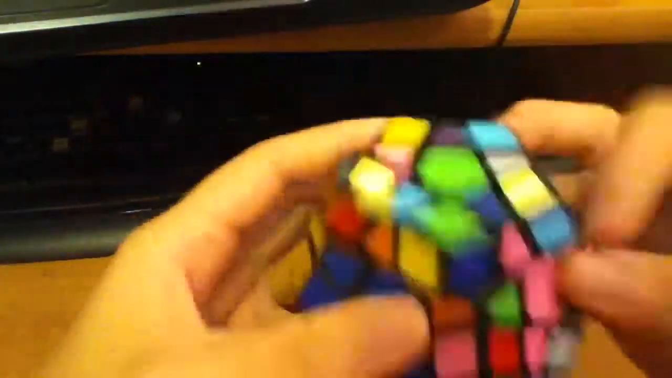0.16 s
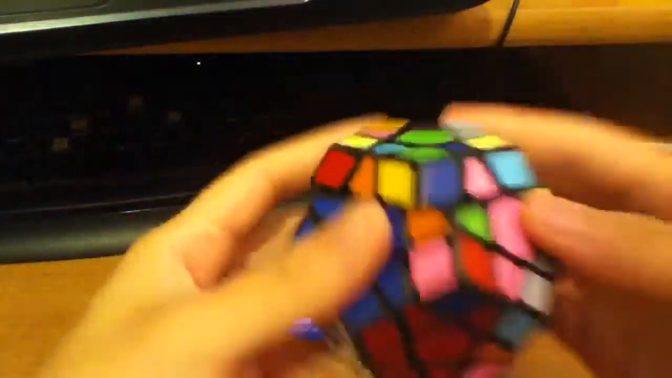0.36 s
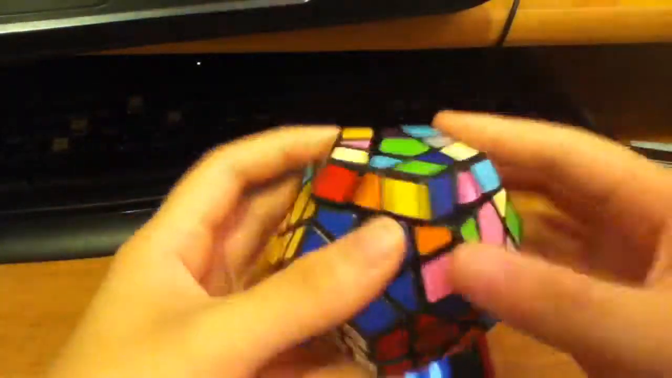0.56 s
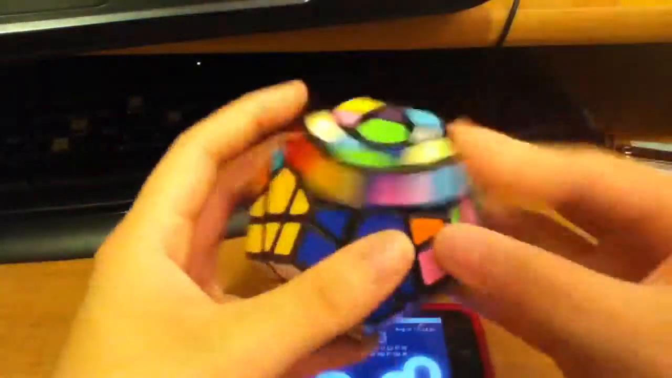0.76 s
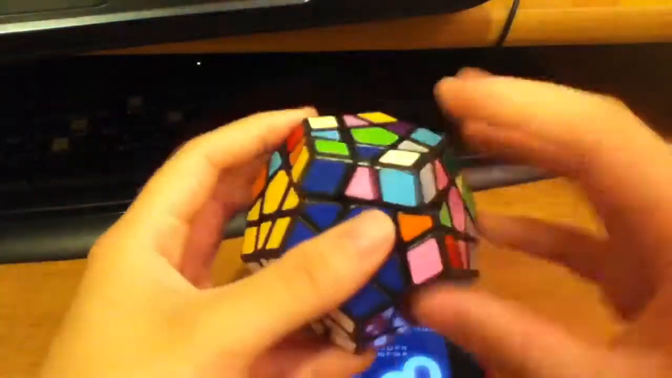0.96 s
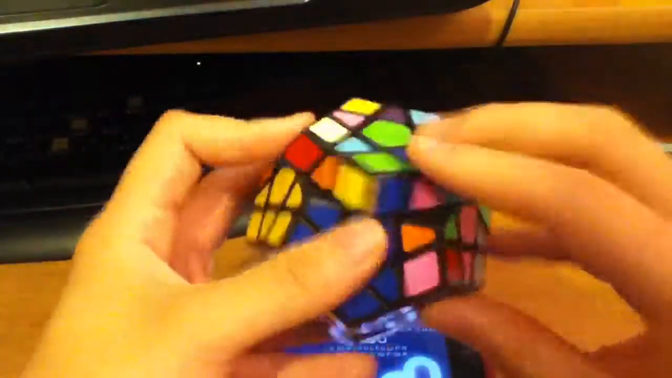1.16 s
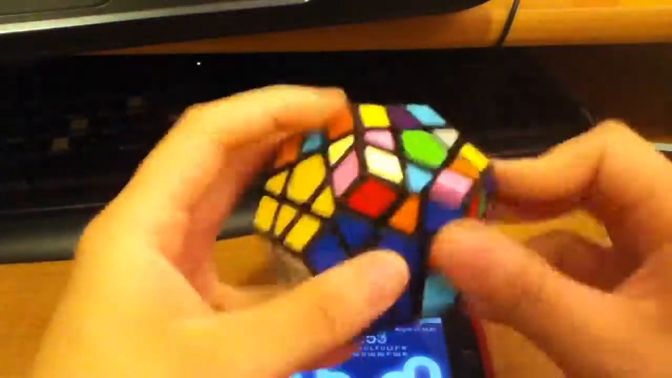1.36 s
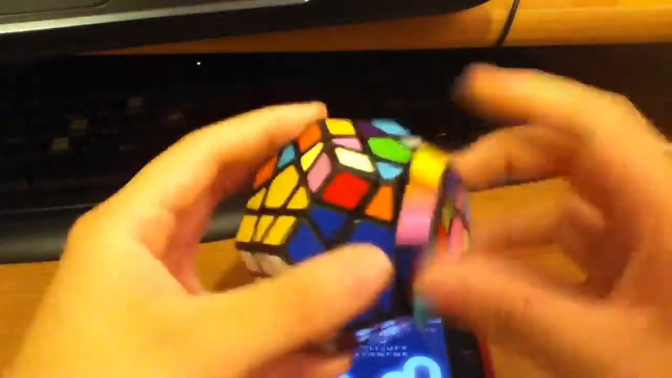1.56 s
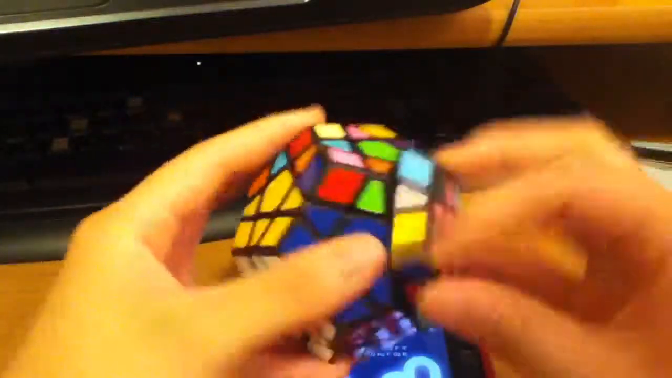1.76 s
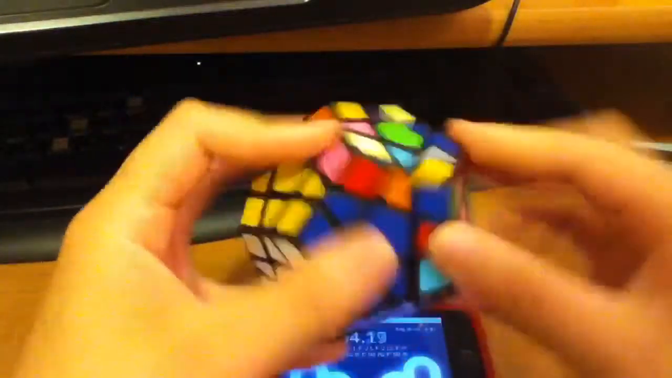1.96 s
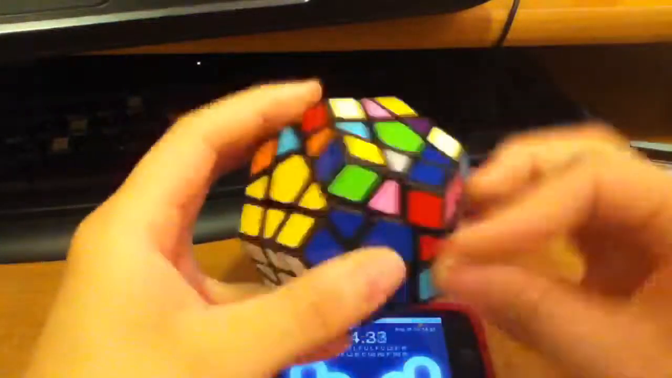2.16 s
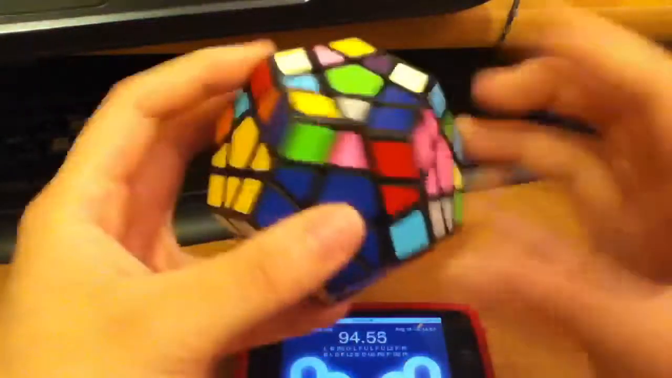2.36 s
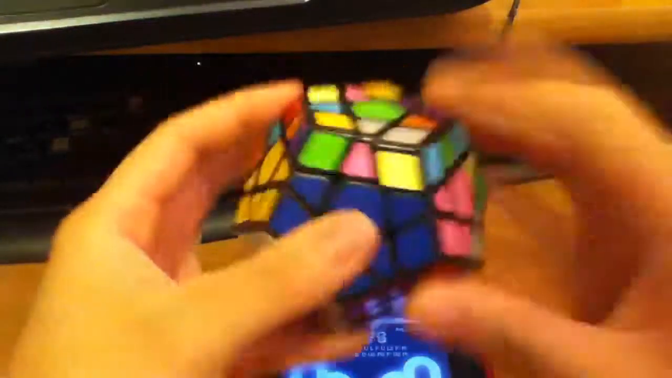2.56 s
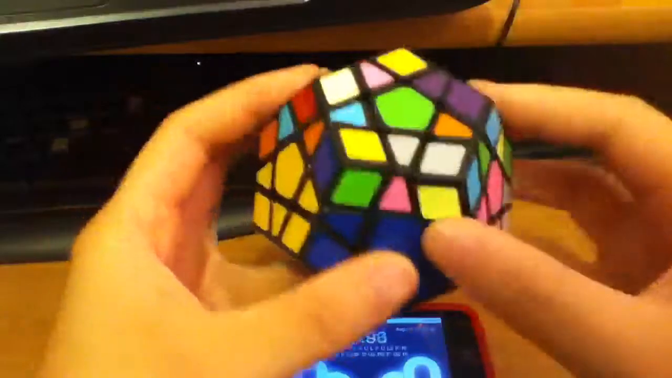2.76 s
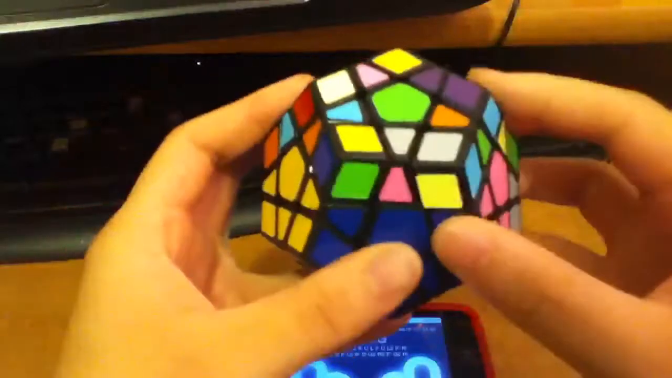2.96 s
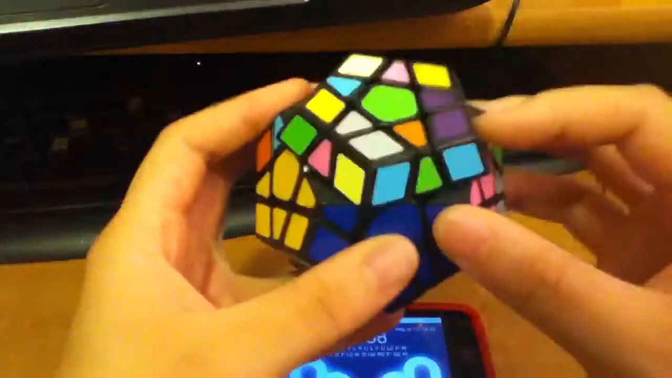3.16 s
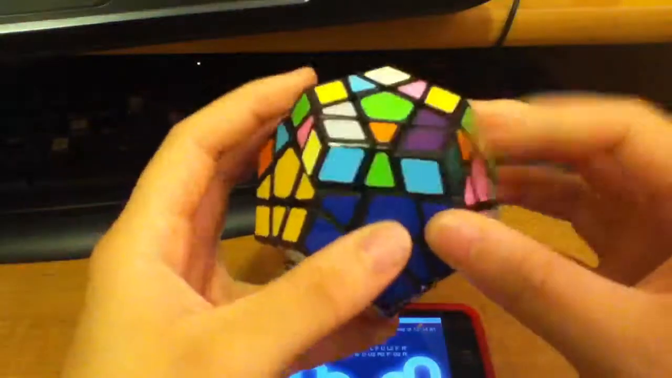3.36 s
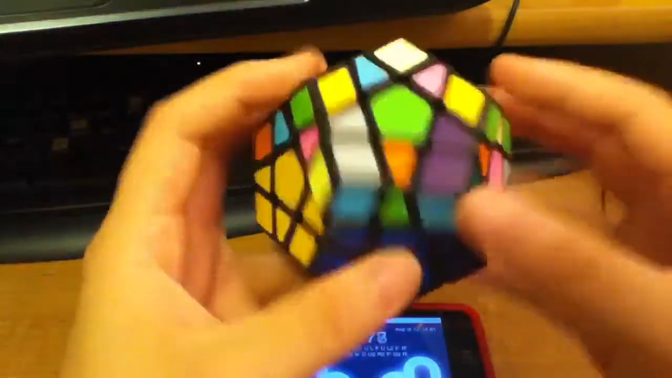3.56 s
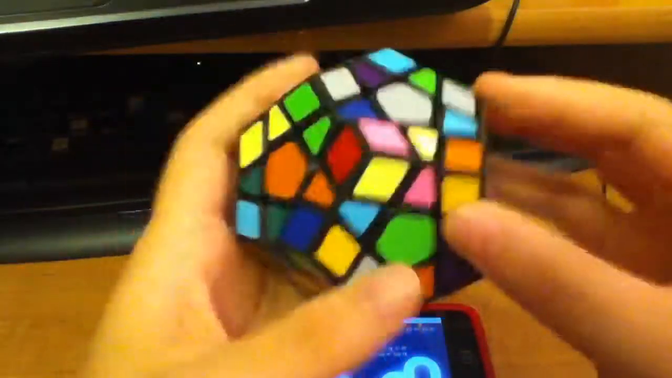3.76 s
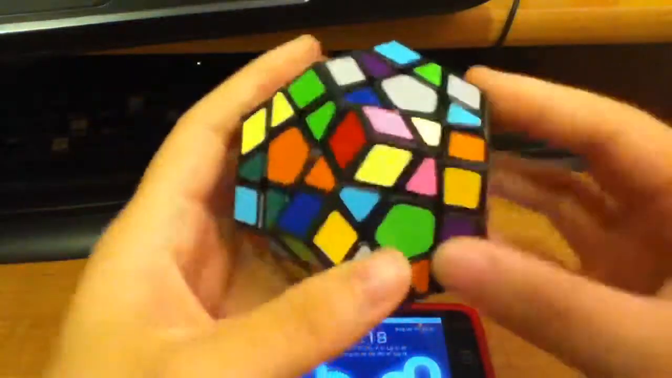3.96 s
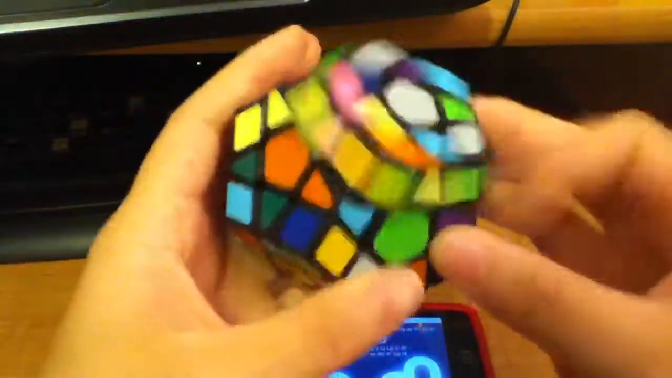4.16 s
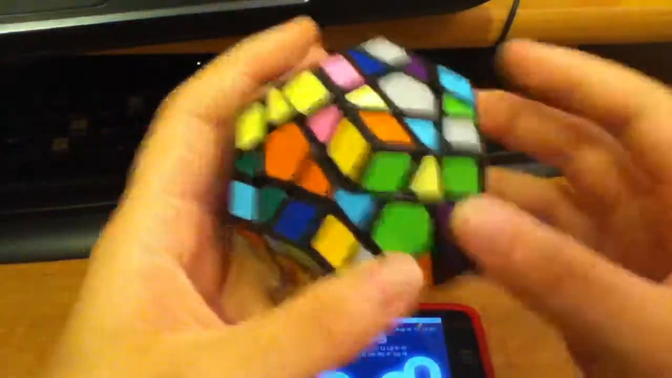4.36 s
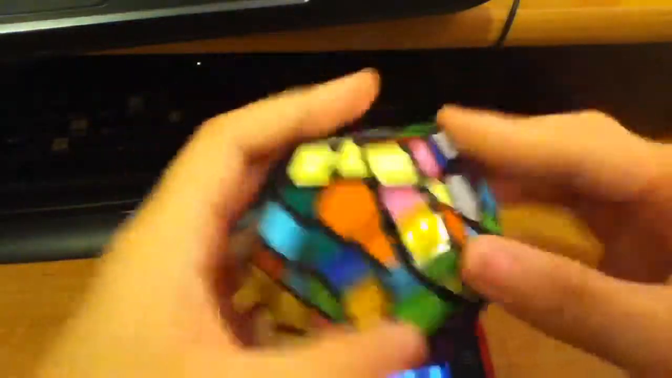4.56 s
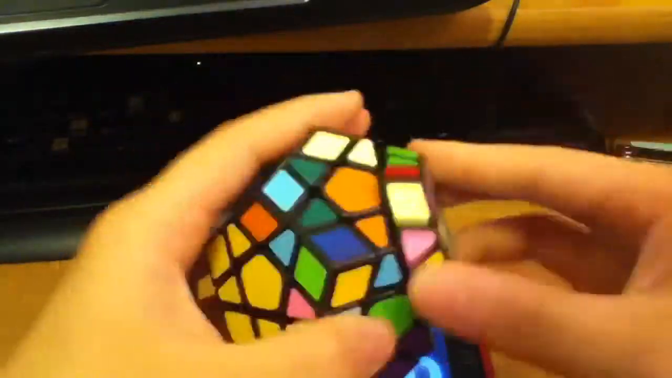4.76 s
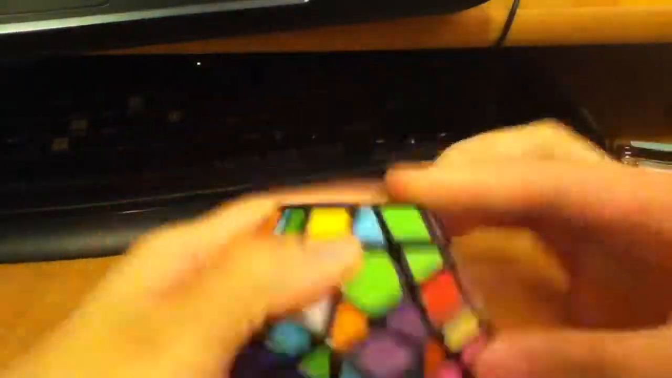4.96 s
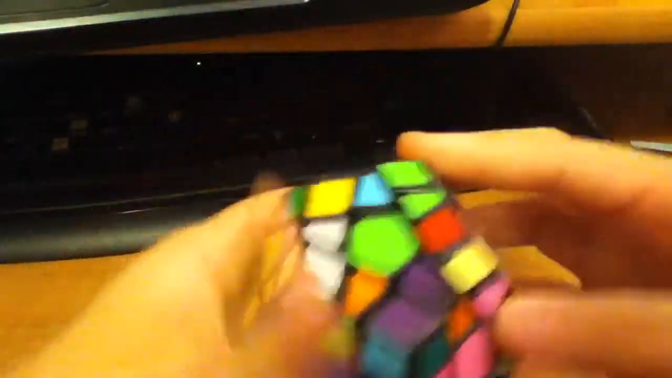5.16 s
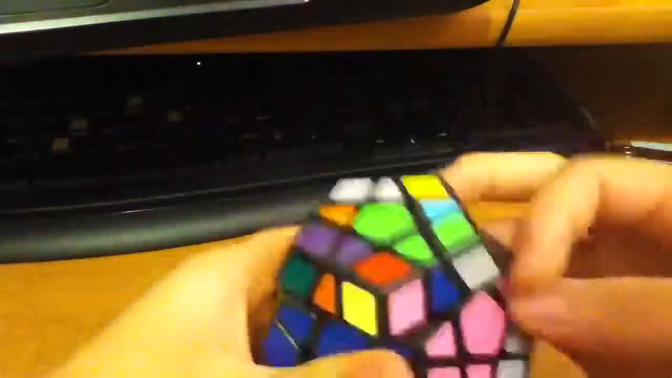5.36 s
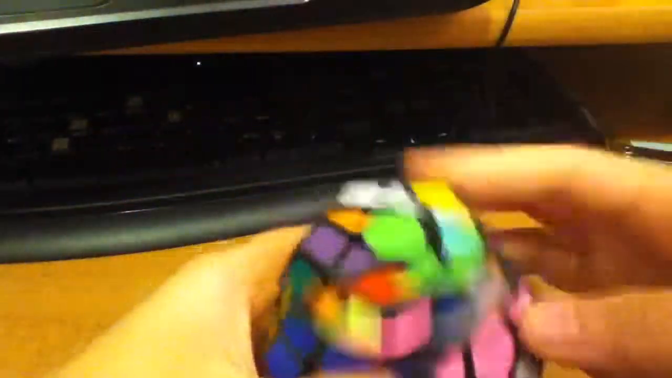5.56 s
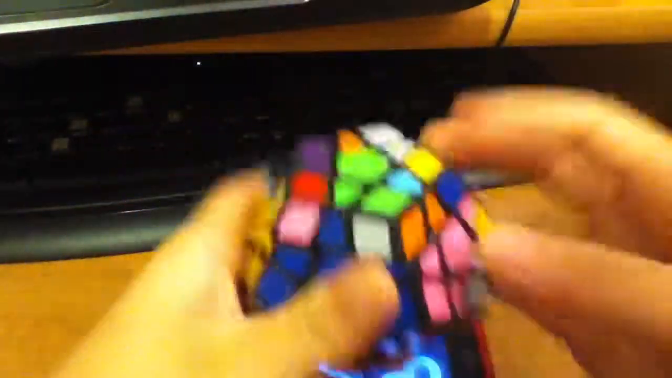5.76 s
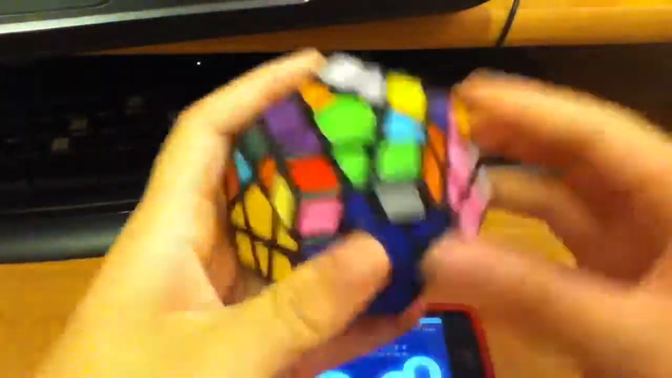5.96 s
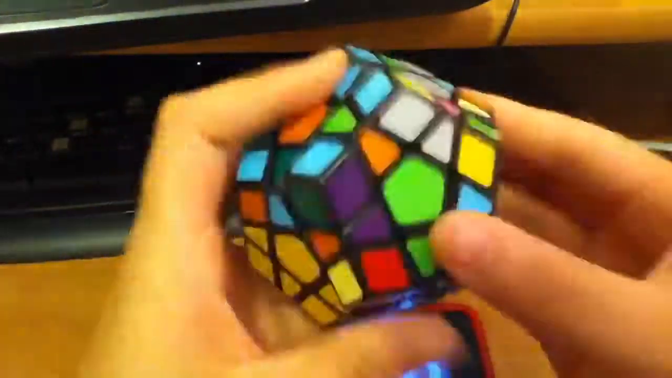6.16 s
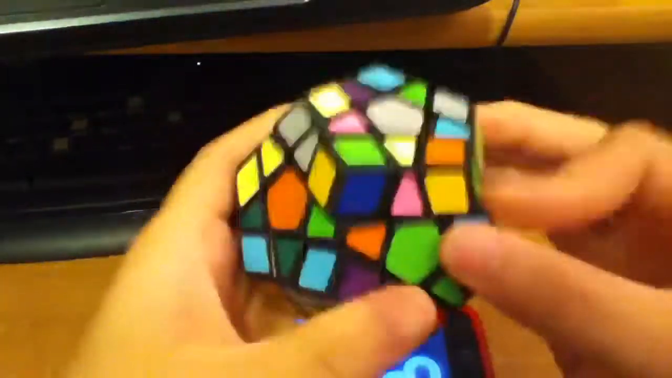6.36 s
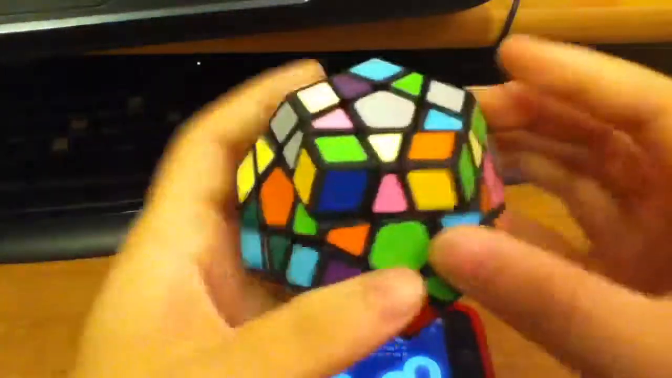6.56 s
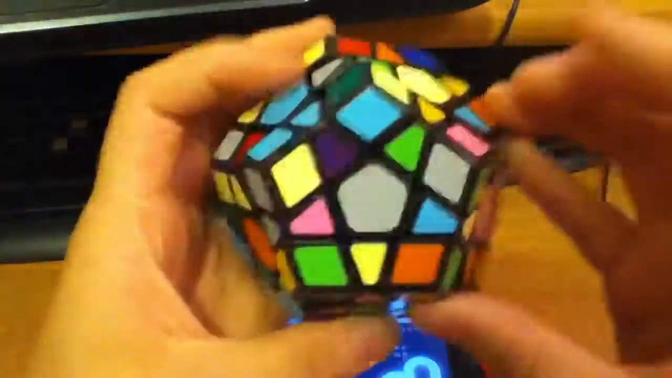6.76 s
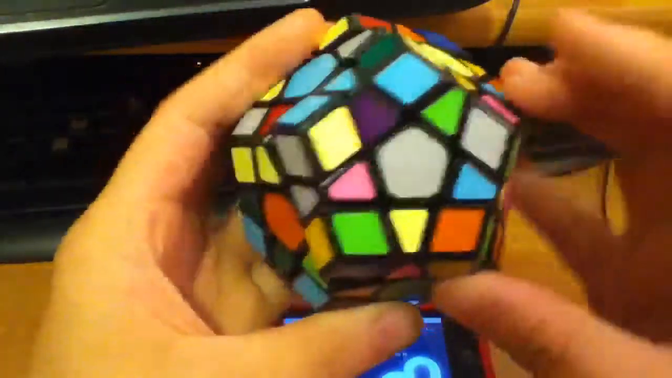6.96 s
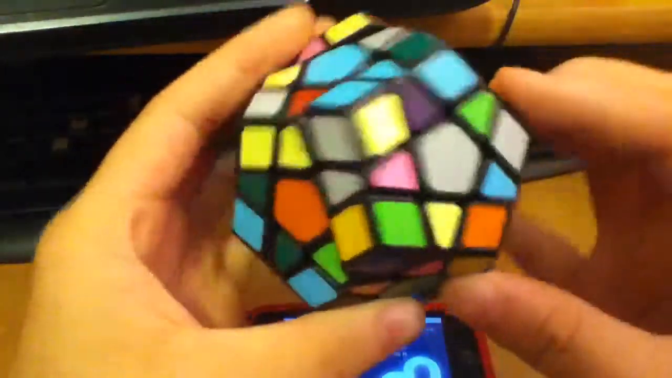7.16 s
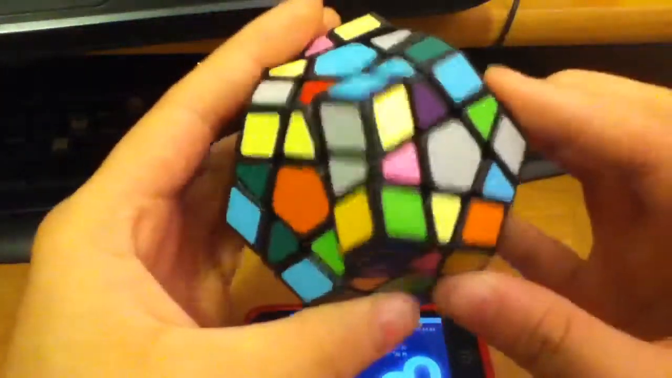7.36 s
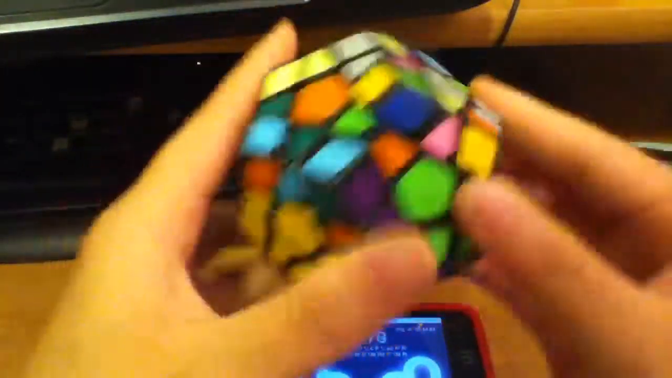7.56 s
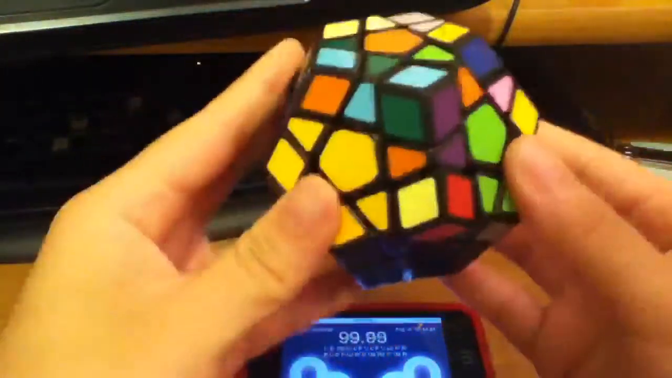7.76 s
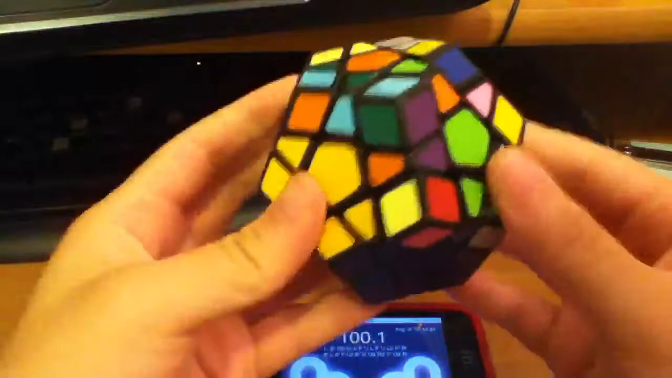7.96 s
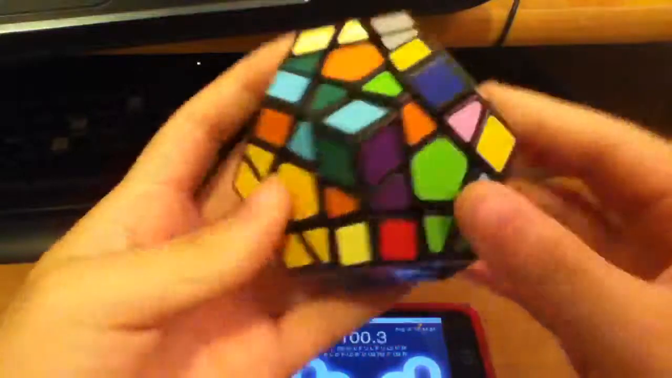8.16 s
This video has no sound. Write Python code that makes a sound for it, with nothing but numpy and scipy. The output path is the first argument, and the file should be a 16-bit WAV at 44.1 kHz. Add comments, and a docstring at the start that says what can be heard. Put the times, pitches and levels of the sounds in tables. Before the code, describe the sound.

Close to the microphone, a many-piece plastic puzzle is twisted fast by hand. Short dry rattles end in sharp hollow snaps, densest in the first two and a half seconds, then sparser with thinking pauses. Another busy cluster comes around five seconds, a last strong clack before six and a half, then mostly quiet. Soft low hand bumps and a small room's short echo sit over a computer fan's hum and faint hiss.

```python
"""At a desk in a small room, a twelve-sided plastic twisting puzzle is solved quickly by hand, close to a microphone.
Each turn of a face is a short rattle: many random touches, each sounding one of a set of hollow clacks.
Sharp clicks, built from the same kind of clack, mark where pieces catch and snap home.
The hands make soft low bumps from fading sine waves, and filtered noise gives the room's answer.
A computer fan hums with noise and wavering tones under a faint hiss."""
import sys
import numpy as np
from scipy import signal
from scipy.fft import rfft, irfft, next_fast_len
from scipy.io import wavfile
from scipy.ndimage import map_coordinates

SR = 44100
rng = np.random.default_rng(int(sys.argv[2]) if len(sys.argv) > 2 else 0)


def wav_out(sig):
    """Save sig, one row per channel (or a flat mono array), as 16-bit PCM at SR to the path in sys.argv[1]."""
    wavfile.write(sys.argv[1], SR, np.round(np.clip(np.atleast_2d(sig).T, -1, 1) * 32767).astype(np.int16))


N = 362495

# Turns of a face. Each row: fastest moment in seconds, rise in seconds, fall in seconds,
# strength of the rattle in dB.
TURNS = [(.206, 0.038, 0.04, -27.5), (0.857, 0.03, 0.039, -32.5), (1.155, 0.057, 0.015, -47),
         (1.32, 0.084, 0.092, -38), (1.519, 0.02, 0.057, -39.5), (1.699, 0.06, .085, -40.5),
         (1.771, 0.017, 0.043, -20.5), (1.934, 0.066, 0.052, -35), (2.039, 0.051, .045, -37.5),
         (2.207, 0.031, 0.0164, -22.5), (2.574, 0.054, 0.083, -39), (3.183, 0.058, 0.015, -36),
         (3.33, 0.056, .019, -46.5), (3.776, 0.023, 0.026, -47), (4.229, .038, .038, -29),
         (4.631, 0.067, 0.088, -53), (4.717, 0.013, .013, -32.5), (4.926, 0.048, 0.048, -40.5),
         (5.035, 0.01, 0.0162, -18), (5.418, 0.033, 0.033, -24.5), (5.551, 0.013, 0.0066, -30.5),
         (5.699, .026, 0.028, -28.5), (6.025, 0.033, 0.089, -52.5), (6.386, 0.038, 0.041, -29.5)]
TYPICAL_DB = -30  # the level that clicks and turns are compared with


def amp(db):
    """Turn decibels into a gain."""
    return 10 ** (np.asarray(db) / 20)


def unit(x):
    """Scale a sound to an rms (average strength) of 1."""
    return x / np.sqrt(np.mean(x ** 2) + 1e-20)


def along(points, hz):
    """Read a curve of (Hz, value) points on a logarithmic frequency axis."""
    point_hz, values = np.transpose(points)
    return np.interp(np.log(hz + 1), np.log(point_hz), values)


def filtered(x, response):
    """Multiply each frequency of a sound by a gain; response gives the gain for each Hz."""
    size = next_fast_len(N + SR // 2)
    spectrum = rfft(x, size) * response(np.fft.rfftfreq(size, 1 / SR))
    return irfft(spectrum, size)[:N]


def wobble(rate):
    """Draw a smooth random curve through a given number of random points a second."""
    points = rng.standard_normal(int(N * rate / SR) + 4)
    return map_coordinates(points, [np.arange(N) * rate / SR])


def causal(db):
    """Make filters that respond as promptly as possible (minimum phase), one per row of dB gains."""
    cepstrum = irfft(np.log(amp(db)))
    half = cepstrum.shape[1] // 2
    # folding the second half onto the first leaves no sound before the blow
    cepstrum[:, 1:half] *= 2
    cepstrum[:, half + 1:] = 0
    return np.exp(rfft(cepstrum))


def add(track, s, sound):
    """Mix a sound into the track at time s in seconds."""
    start = max(round(s * SR), 0)
    part = track[start:start + len(sound)]
    part += sound[:len(part)]


def background(fan_db, hiss_db):
    """A fan makes low noise and wavering tones; a hiss of higher noise slowly drifts in level."""
    # Colour of the air noise. Each row: frequency in Hz, relative level in dB per Hz.
    air = [(15, -54), (25, -14), (82, 6.5), (175, -0.5), (242, -0.5), (384, -9), (427, -12), (476, -11),
           (754, -16.5), (1230, -21.5), (2000, -21.5), (2350, -24), (5570, -25.5), (14800, -30),
           (16000, -36.5)]
    # Drift of the hiss. Each row: time in seconds, level in dB before hiss_db is added.
    floor = [(0, -58), (2.0, -58), (2.8, -61.5), (4.4, -58.5), (5.8, -58), (8.22, -58.5)]
    # Fan and mains tones. Each row: frequency in Hz, middle level in dB.
    tones = [(91, -78), (120, -91), (241, -82.5), (436, -77)]
    t = np.arange(N) / SR

    def low(hz):
        return 1 / (1 + (hz / 1000) ** 2)

    def fan_colour(hz):
        return amp(along(air, hz)) * low(hz)

    def hiss_colour(hz):
        return amp(along(air, hz)) * np.sqrt(1 - low(hz) ** 2)

    fan = unit(filtered(rng.standard_normal(N), fan_colour))
    hiss = unit(filtered(rng.standard_normal(N), hiss_colour))
    hum = np.zeros(N)
    for hz, db in tones:
        level = amp(db + 3.1 * wobble(5.3)) * np.sqrt(2)
        hum += level * np.sin(2 * np.pi * hz * t + 1.83 * wobble(4.7))
    fan_level = amp(fan_db + wobble(3.6))
    hiss_level = amp(np.interp(t, *np.transpose(floor)) + hiss_db)
    return fan_level * fan + hiss_level * hiss + hum


def contacts(bright, hollow, crack_db, crack_t60, shell_db, shell_t60, cavity_hz=1800, size=1024):
    """Pieces collide: fading noise and ringing tones make one clack of energy 1 per brightness value."""
    # Ringing tones of a hollow piece, damped by the fingers. Each row: typical frequency in Hz,
    # typical relative level in dB, time to fade by 60 dB in seconds.
    piece_tones = [(896, -14.5, 0.068), (1380, -10.5, 0.011), (1702, 0.5, 0.014), (2188, -5, 0.029),
                   (2823, 4, 0.0088), (3720, -2.5, 0.0098), (4646, 9, 0.0074), (5325, 3.5, 0.013),
                   (6390, 10, 0.0042), (7370, 11, 0.0026), (9130, 9.5, 0.0068), (11500, 11.5, 0.0043)]
    # Colour of the plastic contacts. Each row: frequency in Hz, relative gain in dB.
    plastic = [(100, -13), (300, -6.5), (560, -8), (850, -3), (1150, 0), (1500, 1), (1900, 2), (3200, 2),
               (5000, 2.5), (8000, -3.5), (10500, -5), (13000, -13), (16000, -21)]
    count, t = len(bright), np.arange(size) / SR
    noise = rng.standard_normal((count, size))
    # a hard crack, and a weak shudder through the neighbouring pieces
    crack = amp(crack_db - 60 * t / crack_t60)
    shudder = amp(shell_db - 60 * t / shell_t60)
    clack = noise * (crack + shudder)
    for hz, db, t60 in piece_tones:
        # every piece rings a little differently
        detune, strength, sign = rng.standard_normal((3, count, 1))
        piece_hz = hz * np.exp(.07 * detune)
        level = amp(db + 3.6 * strength - 60 * t / t60)
        clack += np.sign(sign) * level * np.sin(2 * np.pi * piece_hz * t)
    f = np.fft.rfftfreq(2 * size, 1 / SR)
    octaves = np.log2(np.clip(f, 1000, 14000) / 1000)
    # some contacts sound the air inside the puzzle more than others
    cavity = np.exp(-(np.log2((f + 1) / cavity_hz) / 0.65) ** 2)
    colour = along(plastic, f) + bright[:, None] * octaves + hollow[:, None] * cavity
    clack = irfft(rfft(clack, 2 * size) * causal(colour))[:, :size]
    return clack / np.linalg.norm(clack, axis=1, keepdims=True)


def scatter(per_s, spread_db):
    """Scatter touches of varied strength at random moments, per_s a second on average, with rms 1."""
    happens = rng.random(N) < per_s / SR
    strength_db = spread_db * np.clip(rng.standard_normal(N), -2, 1.5)
    return unit(happens * amp(strength_db))


def rattle(rate, spread_db, edge_db, catch_rate, catch_db, idle_rate, idle_db, count=32):
    """A turning face drags loose pieces over their neighbours; the grip also stirs faint ticks."""
    # Restlessness of the grip. Each row: time in seconds, change of the faint ticks in dB.
    restlessness = [(0, 2.5), (2.4, 0), (2.85, -10.5), (3.5, -2.5), (4.45, -6.5), (4.7, 3.5), (6.4, -2),
                    (7.5, -11.5), (8.22, -13)]
    t = np.arange(N) / SR
    motion = np.zeros(N)
    for fastest, rise, fall, db in TURNS:
        progress = np.maximum((fastest - t) / rise, (t - fastest) / fall)
        inside = progress < 1
        motion[inside] += amp(db - edge_db * progress[inside])
    # the fingers fidget less in the pauses for thought
    fidget = np.interp(t, *np.transpose(restlessness))
    # the face sticks and slips, so that its touches come in clumps
    slips = unit(amp(4 * wobble(200)))
    # some rarer touches are corners that catch harder
    sliding = slips * scatter(rate, spread_db) + amp(catch_db) * scatter(catch_rate, spread_db)
    touches = motion * sliding + amp(idle_db + fidget) * scatter(idle_rate, spread_db)
    piece = rng.integers(count, size=N)
    bright, hollow = rng.standard_normal((2, count))
    clacks = contacts(0.67 * bright - .3, 3 * hollow,
                      crack_db=15, crack_t60=0.0081, shell_db=1, shell_t60=0.019)
    track = np.zeros(N)
    for k, clack in enumerate(clacks):
        track += signal.oaconvolve(touches * (piece == k), clack)[:N]
    return track


def clicks(graze_db=-11, bounce_db=-6):
    """A piece grazes its neighbour, snaps into line and bounces once; harder snaps are brighter."""
    # Clear clicks where a piece catches or snaps home. Each row: time of the snap in seconds,
    # level in dB, relative boost of the hollow ring in dB.
    snap_list = [(0.0736, -22, 3.5), (0.126, -32, -6), (.1737, -30.5, 1), (0.1895, -16, 4),
                 (0.2006, -18, 5), (0.2093, -15, -25), (.218, -19, 10), (0.2283, -17, 6), (.4737, -41, 5.5),
                 (.577, -38.5, 2), (0.6228, -39.5, 3), (0.6651, -37, 2), (0.8035, -30, 1),
                 (0.8397, -26.5, 11), (0.8564, -27, 18), (0.8892, -22.5, 5), (0.8968, -18.5, 2.5),
                 (1.14, -38, -11), (1.1555, -34.5, 2), (1.1782, -31.5, -10), (1.258, -27.5, -8),
                 (1.313, -30, -3), (1.3211, -28, 7), (1.3373, -28.5, 10), (1.359, -33, -3), (1.474, -30, 0),
                 (1.4812, -36, 0), (1.517, -25.5, 3), (1.577, -29.5, 2), (1.6568, -28.5, 13),
                 (1.7015, -23, -3.5), (1.766, -8.5, -19), (1.7791, -10, -11.5), (1.7941, -17, -5),
                 (1.883, -37, 2.5), (1.9308, -24, 1), (1.953, -24, 4), (2.0212, -25.5, 3.5),
                 (2.038, -31, 6), (2.0626, -30, 8), (2.09, -36.5, 2.5), (2.1865, -23.5, -9),
                 (2.191, -19.5, 9), (2.2026, -10.5, -9.5), (2.2179, -14, -7), (2.3185, -16.5, -5.5),
                 (2.4346, -36.5, 8), (2.5652, -24, 1), (2.5922, -22.5, -1), (2.7923, -34.5, -2),
                 (3.0343, -28.5, -1.5), (3.139, -32.5, -3), (3.1567, -32, 7), (3.1892, -27.5, 5),
                 (3.2945, -32, -2), (3.3428, -26.5, -6), (3.6311, -36, 1), (3.7273, -30, 6.5),
                 (3.7693, -36.5, -8), (3.8386, -36.5, 7), (3.8937, -43.5, 12), (4.1193, -43, 0),
                 (4.196, -25.5, -0.5), (4.2038, -21.5, -2), (4.227, -19, 5), (4.2455, -22.5, -8),
                 (4.3185, -37, -9), (4.3835, -43.5, -1), (4.718, -27.5, -10), (4.737, -30, -11),
                 (4.8674, -44, -6), (4.908, -29, -14), (4.9376, -26, -8), (5.0256, -10.5, -2.5),
                 (5.0298, -13, 3), (5.0422, -15, 6), (5.1384, -31.5, 2), (5.1906, -39, 4),
                 (5.221, -31.5, 1), (5.3072, -29.5, 2.5), (5.3743, -32.5, -6), (5.4011, -17.5, -1),
                 (5.4146, -11.5, 8), (5.4213, -15, -8), (5.5393, -28.5, -27), (5.5572, -21.5, 0),
                 (5.6365, -30.5, 4), (5.671, -26, -5), (5.6896, -22.5, -4), (5.7047, -28, -3),
                 (5.8125, -41.5, 6), (6.008, -36, 4), (6.0289, -36, -13), (6.13, -35.5, -2),
                 (6.2349, -22.5, -5), (6.2659, -30, 10), (6.3888, -23, 2), (6.397, -9, 3),
                 (6.4247, -27, -1), (6.779, -40, 9.5), (6.968, -47, 2), (7.128, -46, 10), (7.173, -47, 6),
                 (7.8067, -37.5, 13.5), (8.097, -40.5, 7)]
    tilt_db, tilt_per_db = 0.46, 0.07  # dB per octave at the typical level, and its growth per dB
    track = np.zeros(N)
    times, db, hollow = np.transpose(snap_list)
    bright = tilt_db + tilt_per_db * (db - TYPICAL_DB)

    def clacks():
        return contacts(bright, hollow, crack_db=14.5, crack_t60=0.0026, shell_db=9, shell_t60=0.026)

    grazes, snaps, bounces = clacks(), clacks(), clacks()
    lead, lag = rng.uniform(.3, 1, (2, len(times)))
    for k, s in enumerate(times):
        add(track, s - .0018 * lead[k], amp(db[k] + graze_db) * grazes[k])
        add(track, s, amp(db[k]) * snaps[k])
        add(track, s + .0012 * lag[k], amp(db[k] + bounce_db) * bounces[k])
    # a level in the list is the rms that the snap's energy would have within one millisecond
    return track * np.sqrt(SR / 1000)


def bumps(boom_hz, desk_hz, knock_s, boom_s, desk_share=1.41):
    """A soft blow of the hand: a brief hollow knock with a lower, longer boom of the desk."""
    # Stronger soft bumps of the hands. Each row: start in seconds, typical knock frequency in Hz,
    # knock level in dB, boom level in dB.
    blow_list = [(.113, 506, -42, -60), (.187, 327, -38, -57), (1.255, 358, -39.5, -54),
                 (1.282, 284, -41, -44.5), (1.519, 292, -39, -38), (1.7, 304, -38.5, -39),
                 (1.797, 287, -38.5, -51), (2.003, 320, -41, -50), (2.196, 301, -41.5, -53),
                 (2.321, 295, -44, -41.5), (2.552, 300, -46, -47), (3.766, 260, -54, -48),
                 (3.805, 260, -55, -44), (3.941, 260, -57, -47), (4.263, 260, -46, -41),
                 (4.773, 310, -46, -58), (4.864, 325, -40, -40), (4.931, 308, -44.5, -44),
                 (5.026, 302, -44.5, -51), (5.375, 294, -50, -48), (5.557, 322, -37, -64),
                 (5.634, 282, -46.5, -49), (6.03, 315, -47, -50), (6.237, 280, -57, -46.5),
                 (6.378, 303, -49, -43), (7.221, 356, -39.5, -45)]
    stop_knock_hz, stop_knock_db, stop_boom_db = 260, -52, -53  # for a turn of typical strength
    stop_grows = .4  # dB of jolt per dB of turn
    track, t = np.zeros(N), np.arange(SR // 4) / SR
    blows = list(blow_list)
    # every turn also jolts the hand as it stops, the more the harder it was
    for fastest, rise, fall, db in TURNS:
        force_db = stop_grows * (db - TYPICAL_DB)
        blows.append((fastest + fall, stop_knock_hz, stop_knock_db + force_db, stop_boom_db + force_db))
    chances = rng.standard_normal((len(blows), 3))
    # both parts swell and fade smoothly
    u, v = t / knock_s, t / boom_s
    knock_swell, boom_swell = u * np.exp(1 - u), v * np.exp(1 - v)
    for (s, knock_hz, knock_db, boom_db), chance in zip(blows, chances):
        # each blow is slightly off the typical pitches
        knock_turn, boom_turn, desk_turn = 2 * np.pi * np.exp(.06 * chance)
        # the knock sags in pitch as the soft contact spreads
        knock = knock_swell * np.sin(knock_turn * knock_hz * t / (1 + t / 0.083))
        boom_tone = np.sin(boom_turn * boom_hz * t)
        desk_tone = np.sin(desk_turn * desk_hz * t)
        boom = boom_swell * (boom_tone + desk_share * desk_tone)
        add(track, s, amp(knock_db) * knock + amp(boom_db) * boom)
    return track


def core(x, core_hz, width_hz, shake_db):
    """A turn shakes the whole core of the puzzle; a resonance adds a lower clack."""
    t = np.arange(N) / SR
    turning = np.zeros(N)
    for fastest, rise, fall, db in TURNS:
        turning += np.exp(-((t - fastest) / (rise + fall)) ** 2)
    shaken = amp(shake_db) * x * np.minimum(turning, 1)
    b, a = signal.iirpeak(core_hz, core_hz / width_hz, SR)
    return signal.lfilter(b, a, shaken)


def room(x, near_db, tail_db, count=6):
    """Desk and screen reflect early and the room dies away; the answer changes as the puzzle moves."""
    # Fading of the room. Each row: frequency in Hz, time to fall by 60 dB in seconds.
    fading = [(100, 0.306), (500, 0.39), (2000, 0.22), (6000, 0.26), (10000, 0.25), (15000, 0.22)]
    out = np.zeros(N)
    place = np.arange(N) / SR / .02  # one new answer every 0.02 s, in a repeating cycle
    for k in range(count):
        hz, t, grid = signal.stft(rng.standard_normal(SR // 2), SR, nperseg=256)
        decay = amp(-60 * t / along(fading, hz)[:, None])
        tail = signal.istft(grid * decay, SR, nperseg=256)[1]
        age = np.arange(len(tail)) / SR
        tail *= np.clip(age / 0.0066, 0, 1)
        near = rng.standard_normal(len(tail)) * amp(-60 * age / 0.06) * (age > .002)
        answer = amp(tail_db) * tail / np.linalg.norm(tail)
        answer += amp(near_db) * near / np.linalg.norm(near)
        # neighbouring answers fade into each other
        share = np.clip(1 - np.abs((place - k + 1) % count - 1), 0, 1)
        out += signal.oaconvolve(x * np.sqrt(share), answer)[:N]
    return out


def scene():
    """The puzzle and the hands sound in the room, over the fan and hiss."""
    air = background(fan_db=-57.5, hiss_db=-0.5)
    turning = rattle(rate=1500, spread_db=6, edge_db=14.5, catch_rate=110, catch_db=-4,
                     idle_rate=50, idle_db=-61.5)
    pieces = turning + clicks()
    hands = bumps(boom_hz=112.2, desk_hz=79.2, knock_s=0.0044, boom_s=0.011)
    puzzle = pieces + core(pieces, core_hz=857, width_hz=160, shake_db=-2.5) + hands
    answer = room(puzzle, near_db=-18.5, tail_db=-16)
    return (puzzle + answer + air)[None]


def record(dry):
    """The small microphone loses the deepest bass; the recorder rounds off peaks and limits the band."""
    bass_hz, ceiling, top_hz = 38, .8, 15950
    heard = filtered(dry[0], lambda hz: hz ** 2 / np.sqrt(hz ** 4 + bass_hz ** 4))
    rounded = heard / (1 + (heard / ceiling) ** 4) ** .25
    return filtered(rounded, lambda hz: hz < top_hz)[None]


dry = scene()
out = record(dry)
wav_out(out)
```